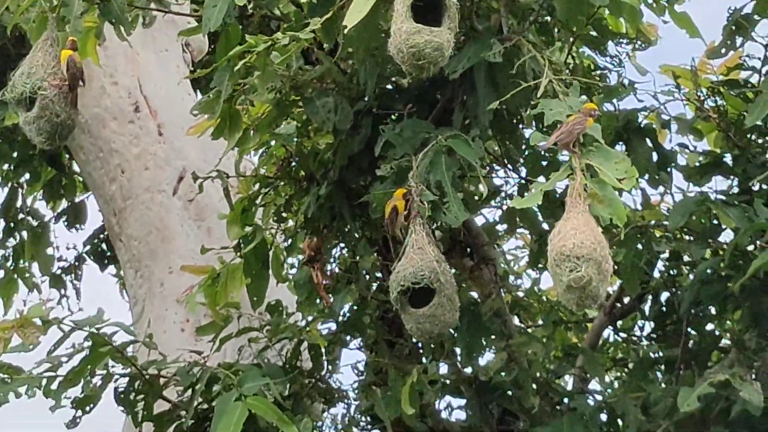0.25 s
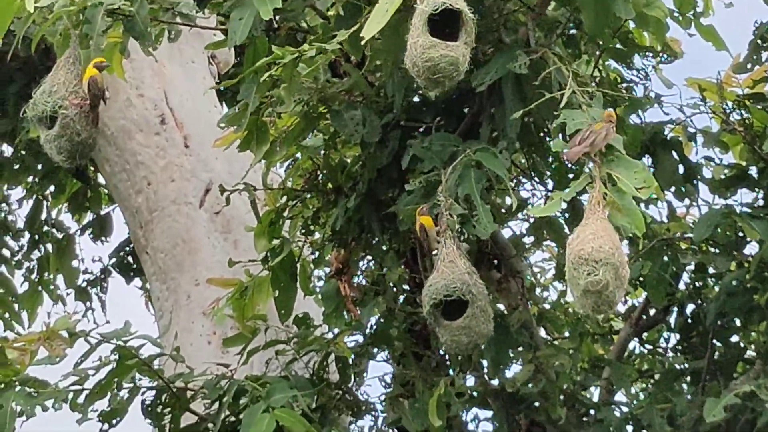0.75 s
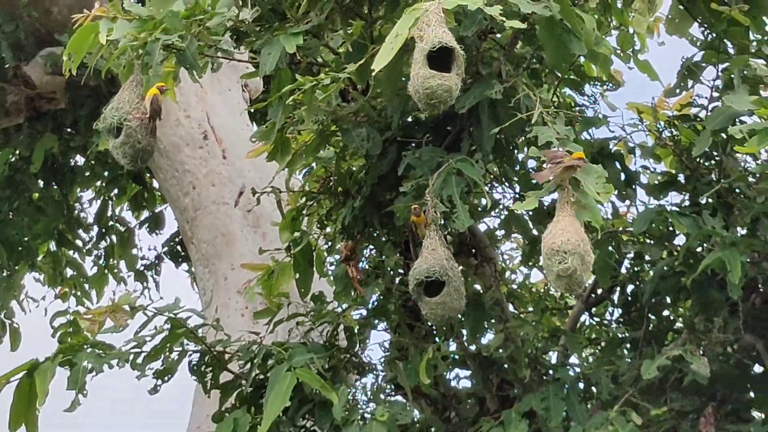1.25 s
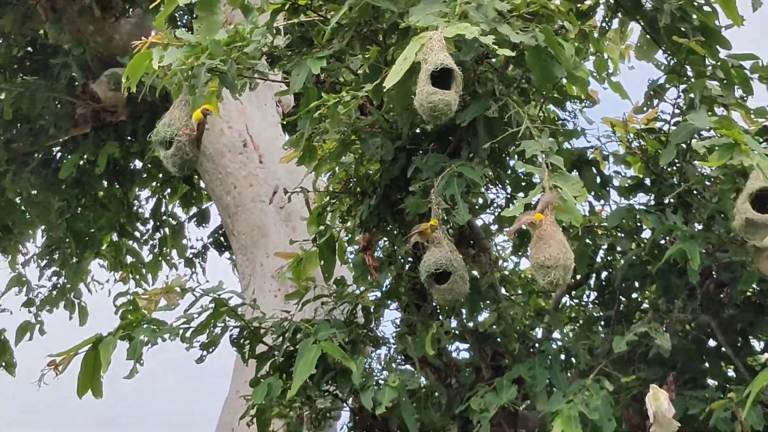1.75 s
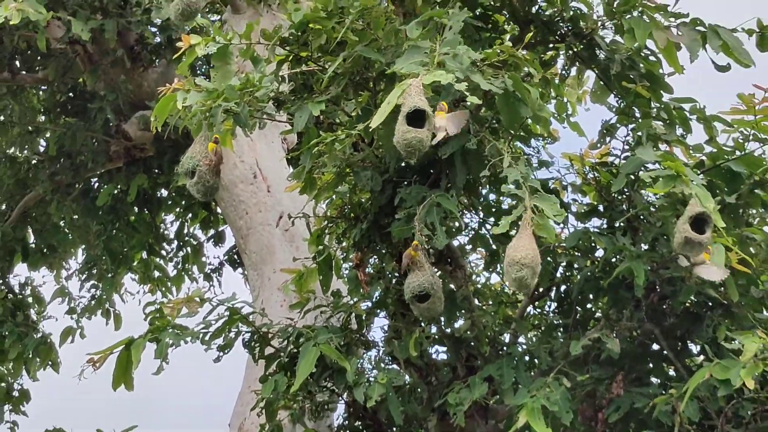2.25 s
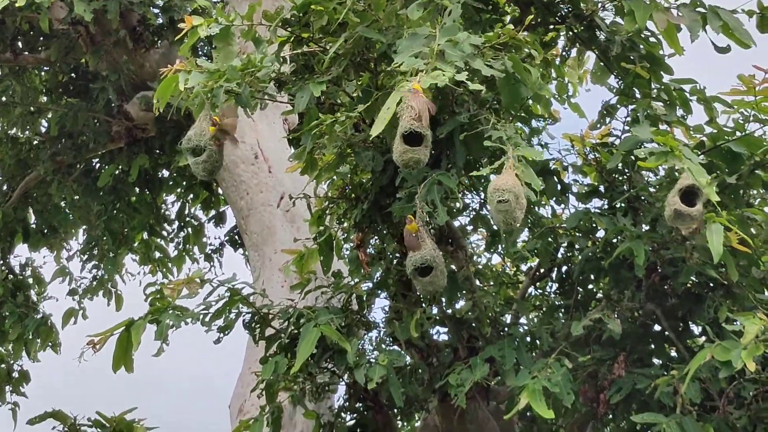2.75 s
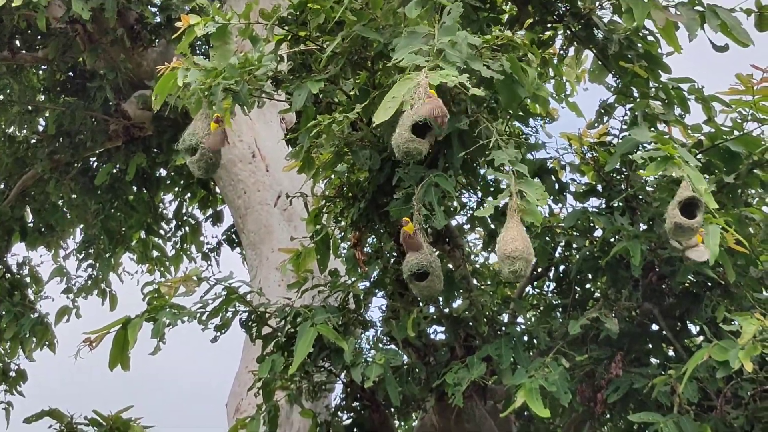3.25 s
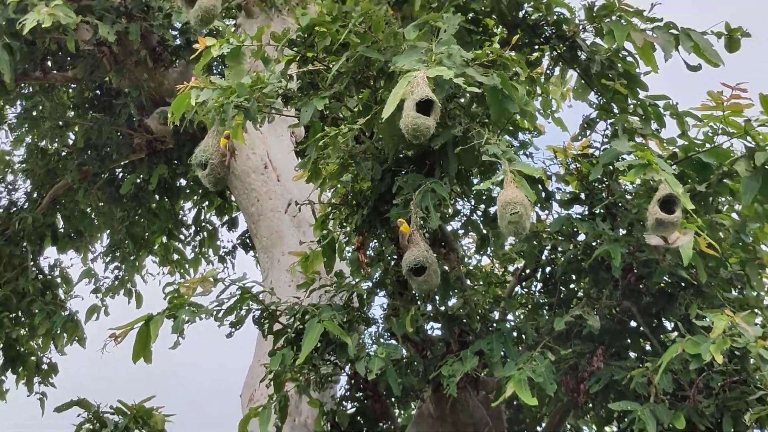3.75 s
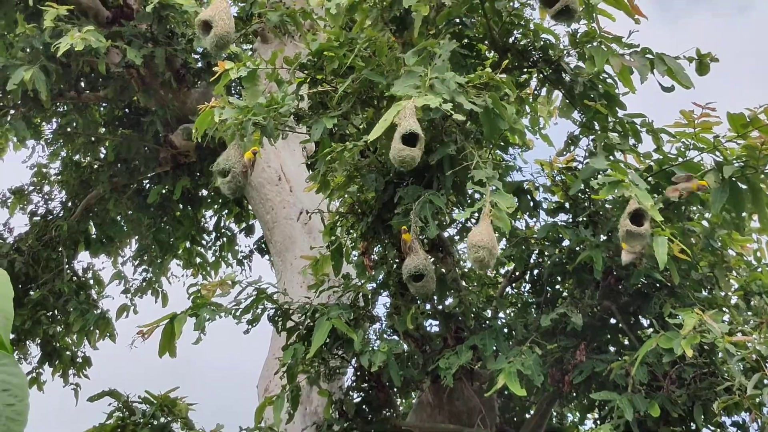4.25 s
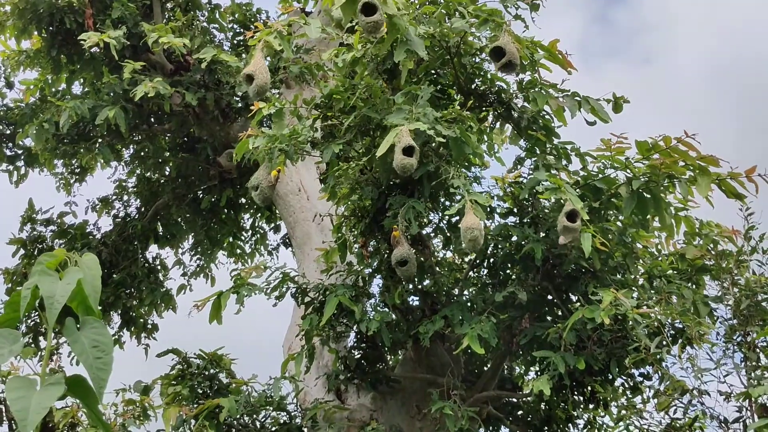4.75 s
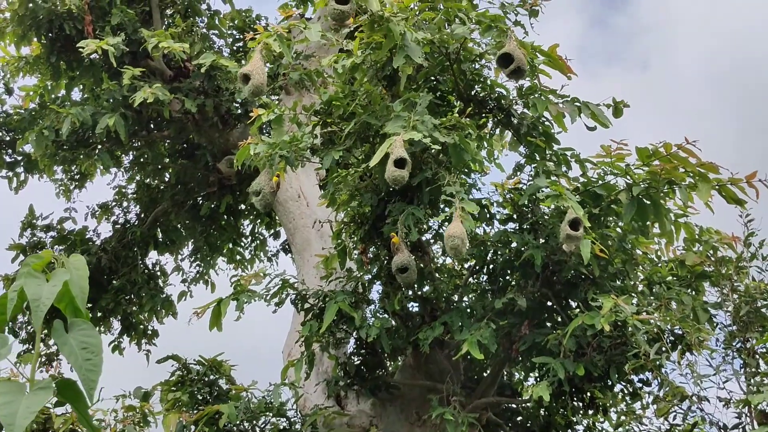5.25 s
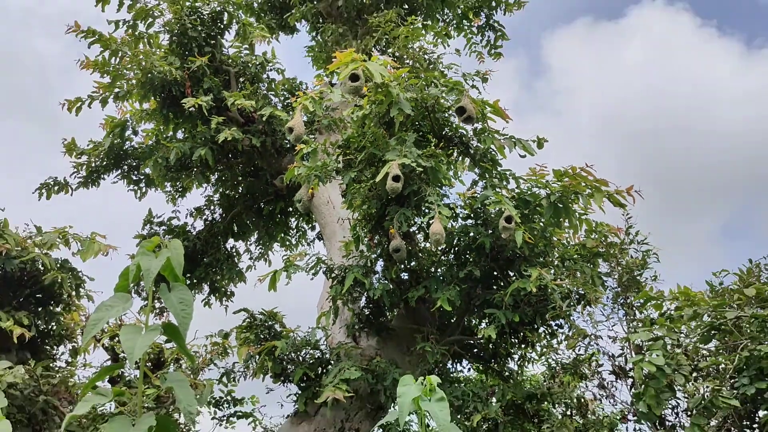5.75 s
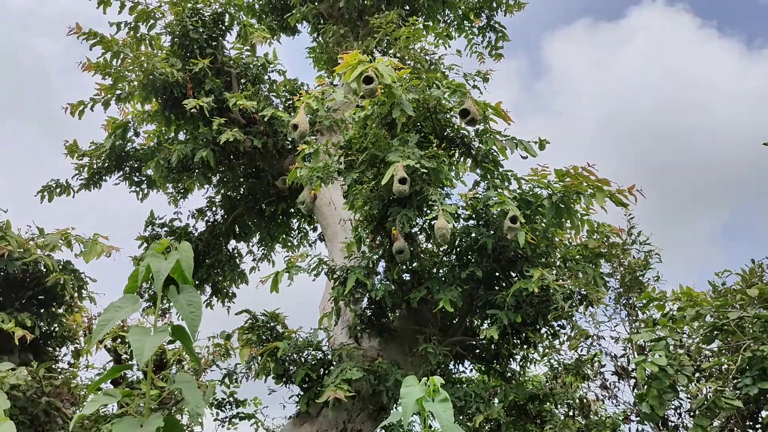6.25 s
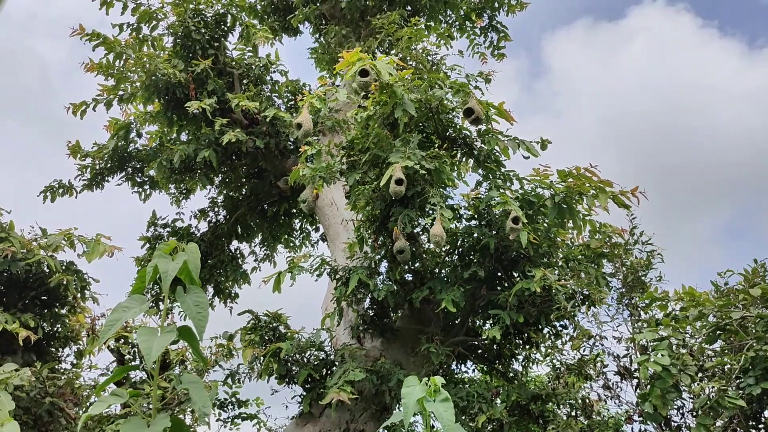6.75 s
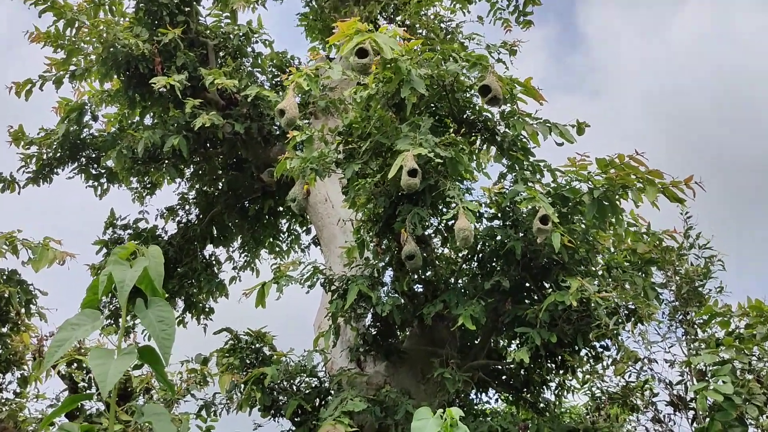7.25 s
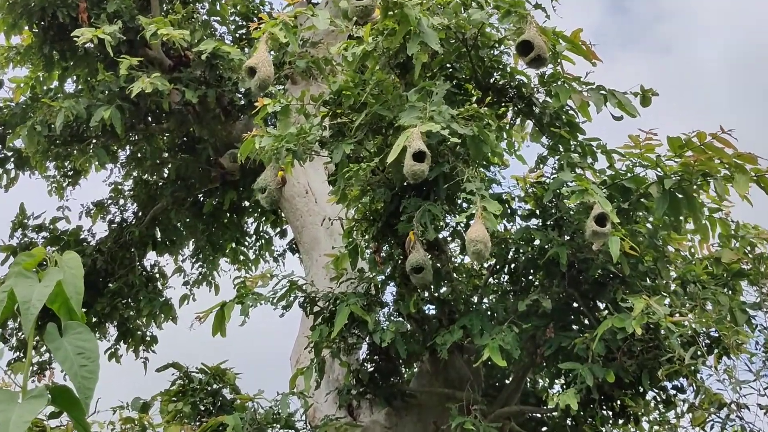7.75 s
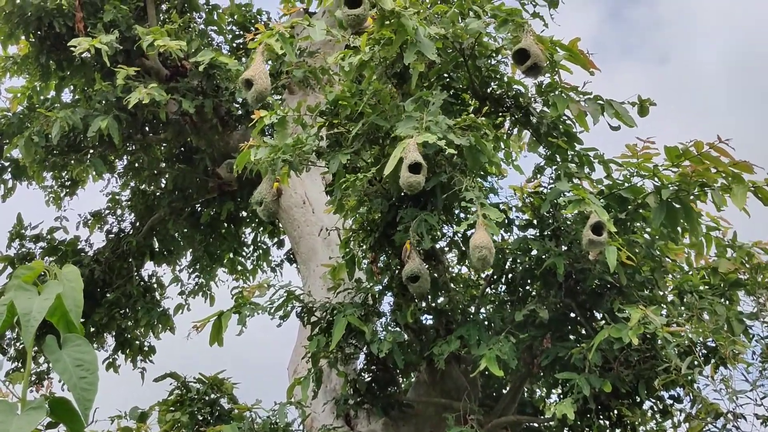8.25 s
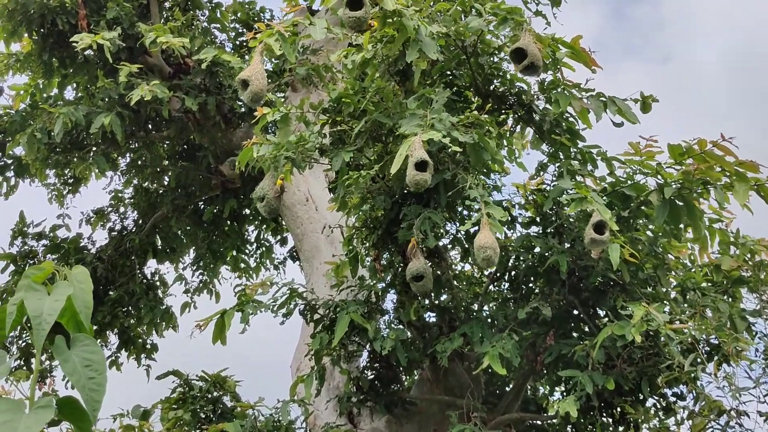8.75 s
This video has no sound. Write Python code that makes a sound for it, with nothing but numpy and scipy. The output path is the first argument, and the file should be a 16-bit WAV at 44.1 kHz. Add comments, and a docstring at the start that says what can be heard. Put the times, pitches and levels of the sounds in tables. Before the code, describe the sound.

Outdoor nesting birds: raspy high chirps repeat nearby, a busy chattering flurry swells early and thins out, nasal calls sounding behind.

```python
"""A leafy tree holding a colony of small weaver birds, heard from the ground through a small stereo microphone.
One near bird repeats a double chirp; others add falling slides, long dives, steep chucks, pips and scolds,
all sung as gliding raspy tones and scattered by leaves. A crowd of overlapping calls swells and ebbs behind.
A nasal harmonic caller and a soft whistler sound farther off, over a light breeze of filtered noise."""
import sys
import numpy as np
from scipy import signal
from scipy.fft import rfft, irfft
from scipy.io import wavfile
from scipy.ndimage import uniform_filter1d

SR = 44100
rng = np.random.default_rng(int(sys.argv[2]) if len(sys.argv) > 2 else 0)


def unload_wav(signal):
    """Save mono or channel-first audio to the path in sys.argv[1] as 16-bit WAV at rate SR, clipped to [-1, 1]."""
    wavfile.write(
        sys.argv[1],
        SR,
        np.round(np.clip(np.atleast_2d(signal).T, -1, 1) * 32767).astype(np.int16),
    )


def convert_level_to_amplitude(level_db):
    """Map a level in decibels to its linear amplitude factor."""
    exponent = np.asarray(level_db, float) / 20
    return 10 ** exponent


N = 397341

# call shapes, one list per stroke of the two-voiced throat: (time after onset [ms], pitch [Hz], level [dB])
SLIDE_STROKES = [
    [(-4, 7600, -30), (2, 7500, -6), (33, 6950, 2), (50, 6250, -2), (58, 5900, -25)],
    [(8, 6800, -30), (14, 6650, -6), (45, 6050, -2), (56, 5950, -12), (63, 5900, 3), (68, 5750, -8),
     (74, 5700, -30)],
    [(60, 5900, -30), (66, 5400, -10), (84, 4100, -19), (112, 3250, -26), (190, 2600, -36)],
    [(76, 7600, -30), (82, 7450, -5), (108, 6750, -5), (120, 6400, -30)],
    [(84, 6800, -30), (90, 6650, -7), (122, 6000, -8), (138, 5800, -30)],
    [(-6, 3450, -35), (2, 3350, -29), (45, 2950, -29), (60, 2800, -38)],
]
CHUCK_STROKES = [
    [(-3, 3800, -28), (0, 3550, 0), (7, 2650, -2), (15, 2200, -12), (32, 1750, -19), (46, 1350, -35)],
]
SECOND_STROKES = [
    [(-3, 5300, -35), (0, 6000, -3), (4, 6400, 0), (9, 6200, -1), (14, 6000, -10), (28, 6200, -32)],
    [(-2, 5200, -30), (1, 5700, -1), (8, 5700, -2), (12, 5200, -10), (18, 4400, -32)],
]  # second half of the double chirp


def rms_one(x):
    """Scale to unit rms."""
    return x / np.sqrt(np.mean(x ** 2) + 1e-20)


def band(x, low_hz, high_hz):
    """Band-pass."""
    return signal.sosfilt(signal.butter(2, [low_hz, high_hz], "band", fs=SR, output="sos"), x)


def coloured(x, spectrum):
    """Flatten the smoothed spectrum, then impose the table's; rms 1."""
    z, hz = rfft(x), np.linspace(1, SR / 2, N // 2 + 1)
    own = np.sqrt(uniform_filter1d(np.abs(z) ** 2, size=1500))
    table_hz, table_db = np.transpose(spectrum)
    want = convert_level_to_amplitude(np.interp(np.log(hz), np.log(table_hz), table_db))
    return rms_one(irfft(z * want / (own + 0.024 * own.mean()), N))


def bell(s, length_s):
    """Smooth rise and fall of height 1, down to 1/e at length_s from the centre."""
    return np.exp(-((np.arange(N) / SR - s) / length_s) ** 2)


def swells(rows, calm_db):
    """Gain of a steady calm with passing swells on top."""
    return convert_level_to_amplitude(calm_db) + sum(convert_level_to_amplitude(db) * bell(s, length_s) for s, length_s, db in rows)


def hush():
    """Level change [dB] of the colony's brief lulls, sample by sample."""
    # lulls: (centre [s], half-width to 1/e [s], depth [dB])
    lulls = [(0.317, 0.048, -25), (0.87, 0.02, -27), (1.206, 0.02, -23), (1.68, 0.039, -9.5),
             (2.092, 0.014, -8.5), (3.482, 0.045, -9), (4.526, 0.035, -17.5)]
    return sum(depth_db * bell(s, length_s) for s, length_s, depth_db in lulls)


def calls(shape, rows, octave_db, rasp, vary, third_db=-40, wobble=.008):
    """Sing the shape at every (time [s], level [dB], pitch factor): gliding sines, two overtones, fast rasp."""
    out = np.zeros(N + SR)
    flutter = rms_one(band(rng.standard_normal(N + SR), 240, 490))
    shake = 1 + wobble * rms_one(band(rng.standard_normal(N + SR), 70, 440))
    stretches = np.clip(1 + vary * rng.standard_normal(len(rows)), .6, 1.6)
    for (s, db, factor), stretch in zip(rows, stretches):
        for ms, hz, line_db in map(np.transpose, shape):
            start = max(round((s + ms[0] * stretch / 1000) * SR), 0)
            at = np.arange(start, round((s + ms[-1] * stretch / 1000) * SR))
            t_ms = (at / SR - s) * 1000 / stretch
            phase = 2 * np.pi * np.cumsum(factor * np.interp(t_ms, ms, hz) * shake[at]) / SR
            tone = np.sin(phase) + convert_level_to_amplitude(octave_db) * np.sin(2 * phase) + convert_level_to_amplitude(third_db) * np.sin(3 * phase)
            gain = convert_level_to_amplitude(db + np.interp(t_ms, ms, line_db)) * (1 + rasp * flutter[at])
            out[at] += gain * tone * signal.windows.tukey(len(at), .12)
    return out[:N]


def canopy(x, scatter_db, t60, direct_db, left_db):
    """Direct sound, later on the left, plus dense dying leaf scatter, separate per side, renewed by sway."""
    left_lag_samples, sway_s = 2, .2
    t, step = np.arange(SR // 3) / SR, round(sway_s * SR)
    padded = np.pad(x, (step, 2 * step))
    pieces = np.lib.stride_tricks.sliding_window_view(padded, 2 * step)[::step]
    pieces = pieces * signal.windows.hann(2 * step, sym=False)  # overlapping crossfades
    decay = convert_level_to_amplitude(-60 * t / t60) * (1 - np.exp(-t / 0.0071))
    tail = rng.standard_normal((2, len(pieces), len(t))) * decay
    tail = convert_level_to_amplitude(scatter_db) * tail / np.sqrt(np.sum(tail ** 2, axis=2, keepdims=True))
    tail[0, :, left_lag_samples] += convert_level_to_amplitude(direct_db)
    tail[1, :, 0] += convert_level_to_amplitude(direct_db)
    heard = signal.fftconvolve(pieces[None], tail, axes=2)
    out = np.zeros((2, N + 2 * SR))
    for k in range(len(pieces)):
        out[:, k * step:k * step + heard.shape[2]] += heard[:, k]
    return out[:, step:N + step] * convert_level_to_amplitude(np.array([[left_db / 2], [-left_db / 2]]))


def patchy(shared_db, x):
    """Third-octave bands above 1.2 kHz swell and fade together and each by itself."""
    out = signal.sosfilt(signal.butter(4, 1200, fs=SR, output="sos"), x)
    edges_hz = np.geomspace(1200, 9000, 10)
    for low_hz, high_hz in zip(edges_hz, edges_hz[1:]):
        own_db = 3 * rms_one(band(rng.standard_normal(N), 2, 9))
        out = out + convert_level_to_amplitude(shared_db + own_db - 2) * band(x, low_hz, high_hz)
    return out


def breeze():
    """Lumpy rumble, partly shared by both ports, a duller flutter above it, uneven hiss of air and far birds."""
    # gusts rumbling on the microphone ports: (centre [s], half-width to 1/e [s], level [dB])
    gusts = [(0.05, 0.49, -77.5), (1.63, 0.071, -66), (2.03, 0.19, -69), (3.46, 0.074, -72.5),
             (3.78, 0.19, -77.5), (4.4, 0.13, -80.5)]
    # dull flutters of leaves and wings: (centre [s], half-width to 1/e [s], level [dB])
    flutters = [(0.2, 0.29, -83.5), (2.5, 0.074, -82.5), (2.81, 0.078, -74.5), (3.15, 0.087, -83.5),
                (3.46, 0.018, -69.5), (3.92, 0.16, -82), (5.46, 0.11, -87), (7.96, 0.16, -85)]
    # relative hiss spectrum: (frequency [Hz], density [dB per Hz])
    air_spectrum = [(15, -54.5), (25, -27), (112, -16.5), (269, -47), (781, -45.5), (1020, -39),
                    (1300, -60), (1700, -38.5), (2010, -29.5), (2330, -29.5), (3340, -5), (6280, -11),
                    (7620, 7.5), (8200, -43.5), (10700, -73.5), (18000, -120)]
    air_db, hush_share = -49.5, 0.24  # the hiss sinks by this share of a lull's dB
    mid, side, leaf, hiss_left, hiss_right, lump = rng.standard_normal((6, N))
    lumps = convert_level_to_amplitude(0.46 * rms_one(band(lump, 5.2, 35)))
    pair = mid + 0.6 * side * np.array([[1], [-1]])
    rumble = swells(gusts, calm_db=-88.5) * lumps * rms_one(band(pair, 89, 163))

    dull = rms_one(band(band(leaf + 0.28 * pair, 150, 440), 230, 470))
    flutter = swells(flutters, calm_db=-102) * lumps * dull * convert_level_to_amplitude(np.array([[4], [-6]]))

    shared = 2.1 * band(mid, 21, 130)
    hiss = np.array([coloured(own + shared, air_spectrum) for own in (hiss_left, hiss_right)])
    drift_db = 4.6 * rms_one(band(lump, 1.67, 6.04))
    air = convert_level_to_amplitude(air_db + hush_share * hush()) * patchy(drift_db, hiss)
    return rumble + flutter + air


def nasal_caller():
    """Harmonic stack near 1 kHz: rises, droops and wavers; strong upper overtones come and go separately."""
    # calls: (time [s], length [s], pitch before bends [Hz], level [dB], overtone level before trims [dB])
    nasal_rows = [(0.087, 0.088, 1040, -79.5, 10), (0.391, 0.031, 1000, -72.5, -22),
                  (0.535, 0.067, 1035, -74.5, 7), (1.969, 0.14, 1178, -71.5, 0),
                  (2.33, 0.29, 1194, -71.5, 11), (2.89, 0.2, 1142, -73, -6), (3.244, 0.11, 1092, -70, 18),
                  (3.6, 0.13, 1097, -71.5, 7.5), (4.109, 0.26, 1204, -72, 1), (4.593, 0.18, 1054, -86, 17),
                  (4.956, 0.17, 1114, -78, 18), (5.316, 0.25, 1088, -75, 13.5),
                  (5.709, 0.24, 993, -75.5, 3.5), (6.103, 0.23, 1016, -73, 8), (6.598, 0.14, 1021, -72, 8),
                  (6.908, 0.2, 1005, -76, 9.5), (7.372, 0.18, 1034, -76, 8.5),
                  (7.708, 0.36, 1062, -84, 17.5), (8.305, 0.16, 1030, -73.5, 9.5),
                  (8.719, 0.21, 1018, -73.5, 11.5)]
    # trims of multiples 2 to 7: (level [dB])
    overtone_trims = [-15.5, -10.5, -1.5, 3, 5.5, -7.5]
    rest_hz, sag_per_s = 914, 1.7  # share of the distance to rest, per second of call
    out = np.zeros(N)
    waver = rms_one(band(rng.standard_normal(N), 14.0, 37))
    patches = [rms_one(band(n, 3, 14)) for n in rng.standard_normal((len(overtone_trims), N))]
    for s, length_s, first_hz, db, over_db in nasal_rows:
        sag_hz = (first_hz - rest_hz) * sag_per_s * length_s
        at = np.arange(round(s * SR), round((s + length_s) * SR))
        u = np.linspace(0, 1, len(at))
        hz = first_hz * (1 - 0.03 * (1 - u) ** 4.5) - sag_hz * u ** 2.6
        phase = 2 * np.pi * np.cumsum(hz * (1 + 0.016 * waver[at])) / SR
        over = 0
        for k, trim_db in enumerate(overtone_trims):
            gain = convert_level_to_amplitude(over_db - 2.0 + trim_db + 3 * patches[k][at])
            over = over + gain * np.sin((k + 2) * phase)
        swell = np.sin(np.pi * u) ** 0.13 * (1 + 0.5 * waver[at])
        out[at] += convert_level_to_amplitude(db) * swell * (np.sin(phase) * (0.4 + 0.78 * u) + over * (1 - 0.066 * u))
    return canopy(out, scatter_db=5, t60=0.13, direct_db=-2.0, left_db=-2.0)  # mostly scattered


def whistler():
    """Soft whistles that rise then fall, with more direct sound than scatter."""
    # stroke: (time after onset [ms], pitch [Hz], level [dB])
    whistle_strokes = [
        [(0, 1950, -30), (12, 2200, -6), (26, 2400, 3), (40, 2250, -6), (56, 2000, -22), (76, 1650, -30)],
    ]
    # calls: (time [s], level [dB], pitch factor [1])
    whistle_rows = [(6.084, -53.5, 1.001), (8.435, -62, .9)]
    sung = calls(whistle_strokes, whistle_rows, octave_db=-12.5, rasp=0.4, vary=0.018, wobble=.03)
    return canopy(sung, scatter_db=-4, t60=0.13, direct_db=1.5, left_db=-1.5)


def crowd(count):
    """Many birds overlap three calls in loose turn at random pitches; their sum follows the colony's swell."""
    # excitement of the colony as crowd level: (time [s], level [dB])
    excitement = [(0.0, -51), (0.12, -36.5), (0.24, -88), (0.5, -49.5), (1.08, -40), (1.43, -34),
                  (2.56, -31), (2.76, -29), (3.79, -30), (4.47, -37.5), (4.82, -37), (5.07, -49),
                  (5.13, -45), (5.8, -54.5), (6.1, -47), (7.0, -55.5), (7.68, -55), (7.9, -48), (8.05, -55),
                  (9.01, -50)]
    # relative crowd spectrum: (frequency [Hz], density [dB per Hz])
    crowd_spectrum = [(650, -70.5), (1100, -38), (1780, -41), (2170, -28), (2590, -28), (3090, -21),
                      (4120, 4.5), (4670, -5), (5120, -11), (6060, -10), (7350, -15.5), (7800, -3),
                      (8200, -58.5), (10700, -62.5), (18000, -120)]
    calm_db, low_trim_db, low_follow = -65, -0.5, 0.92  # low voices follow this share of the swell
    babble = 0
    for shape, octave_db in ((SECOND_STROKES, -6), (SLIDE_STROKES, -12), (CHUCK_STROKES, 8)):
        when, loud, pitch = rng.random((count, 3)).T
        times_s = (np.arange(count) + 2 * when) / count * N / SR
        rows = np.transpose([times_s, 10 * loud, .78 + .34 * pitch])
        sung = calls(shape, rows, octave_db=octave_db, rasp=0.5, vary=.25,
                     third_db=octave_db - 4.5, wobble=.02)
        babble = babble + canopy(sung, scatter_db=-2, t60=0.2, direct_db=-7, left_db=0)
    babble = np.array([coloured(ear, crowd_spectrum) for ear in babble])
    babble = babble * convert_level_to_amplitude(np.array([[1.7], [-1.7]]))
    level_db = np.interp(np.arange(N) / SR, *np.transpose(excitement))
    low_db = calm_db + low_trim_db + low_follow * (level_db - calm_db)
    hush_db = hush()
    out = 0
    for (low_hz, high_hz), db in (((4300, 8200), level_db), ((1000, 4300), low_db)):
        part = band(babble, low_hz, high_hz)
        power = uniform_filter1d(np.mean(part ** 2, axis=0), size=4000)  # evens out chance clumps and gaps
        out = out + convert_level_to_amplitude(db + hush_db) * part / np.sqrt(power + 0.15 * power.mean())
    return out


def scolds():
    """Raspy scolding notes, two falling lines with strong overtones."""
    # strokes: (time after onset [ms], pitch [Hz], level [dB])
    scold_strokes = [
        [(-2, 1430, -30), (3, 1400, -4), (22, 1300, -10), (41, 1150, -35)],
        [(-3, 2200, -28), (4, 2100, 1), (27, 2000, -7), (43, 1800, -33)],
    ]
    # calls: (time [s], level [dB], pitch factor [1])
    scold_rows = [(0.573, -65, 0.89), (0.67, -64, 0.81), (0.789, -61, 0.97), (0.8992, -60.5, 0.91),
                  (1.0021, -61, 0.97), (1.134, -59.5, 0.95), (1.225, -64, 0.91), (1.3448, -60, 0.94),
                  (1.476, -70, 0.76)]
    sung = calls(scold_strokes, scold_rows, octave_db=7.5, rasp=0.4, vary=0.11, third_db=-4.5)
    return canopy(sung, scatter_db=-4.5, t60=0.26, direct_db=-8.5, left_db=-1.0)


def chucks():
    """Steep falls whose overtones outweigh the fundamental."""
    # calls: (time [s], level [dB], pitch factor [1])
    chuck_rows = [(0.9043, -46.5, 1), (1.693, -40, 0.96), (1.8, -41, 0.94), (2.049, -53, 0.68),
                  (2.108, -41.5, 1), (2.168, -50, 0.69), (2.43, -57.5, 0.83), (3.5294, -40, 1.05),
                  (3.932, -48, 0.99), (4.089, -45, 0.98), (4.2422, -38.5, 1.0), (4.394, -40.5, 1.01),
                  (4.557, -40, .98), (4.6291, -51.5, 0.97), (4.915, -42, 1.1), (5.2804, -47.5, 0.92),
                  (5.4655, -54.5, 0.91), (6.052, -51.5, 0.92), (8.397, -53.5, 0.9)]
    sung = calls(CHUCK_STROKES, chuck_rows, octave_db=17, rasp=0.3, vary=.08, third_db=8, wobble=.018)
    return canopy(sung, scatter_db=-10, t60=0.2, direct_db=-11, left_db=3.5)


def pips():
    """Short, slightly falling near-sine notes, many in quick runs."""
    # stroke: (time after onset [ms], share of pitch [1], level [dB])
    pip_strokes = [
        [(-4, 1.05, -28), (4, 1.02, 0), (12, 1.0, -2), (22, 0.94, -10), (30, 0.9, -30)],
    ]
    # calls: (time [s], level [dB], pitch [Hz])
    pip_rows = [(1.6796, -45, 4240), (2.034, -36, 4240), (2.1173, -38, 4520), (2.2382, -30.5, 4610),
                (2.333, -27, 4420), (2.548, -33.5, 4500), (2.657, -27.5, 4640), (2.7555, -23, 4850),
                (2.857, -34, 4740), (3.1687, -46, 4720), (3.271, -23, 4970), (3.3626, -30.5, 4620),
                (3.5366, -29, 4650), (3.7643, -29.5, 4850), (3.9172, -23, 4930), (4.468, -35.5, 4410)]
    sung = calls(pip_strokes, pip_rows, octave_db=-40, rasp=0.48, vary=0.045)
    return canopy(sung, scatter_db=-9, t60=0.12, direct_db=-6, left_db=3.0)


def dives():
    """Long dives from a held note."""
    # stroke: (time after onset [ms], pitch [Hz], level [dB])
    dive_strokes = [
        [(-8, 5900, -25), (0, 5850, -7), (20, 5900, 0), (26, 5500, -5), (38, 4300, -11), (58, 3900, -13),
         (66, 4100, -28)],
    ]
    # calls: (time [s], level [dB], pitch factor [1])
    dive_rows = [(1.296, -31, .99), (1.484, -27, 1.03)]
    sung = calls(dive_strokes, dive_rows, octave_db=-39, rasp=0.22, vary=0.0066)
    return canopy(sung, scatter_db=-17, t60=0.12, direct_db=-3.5, left_db=6.0)


def slides():
    """Two-note falling slides, built of overlapping gliding strokes."""
    # calls: (time [s], level [dB])
    slide_rows = [(1.4717, -25.5), (1.862, -27), (2.2694, -28.5), (2.6764, -25), (2.7697, -32),
                  (3.065, -24.5), (3.2713, -35), (3.3572, -33), (3.7984, -30), (4.27, -27), (4.68, -30)]
    rows = [(s, db, 1) for s, db in slide_rows]
    sung = calls(SLIDE_STROKES, rows, octave_db=-20.5, rasp=0.6, vary=.05, wobble=.015)
    return canopy(sung, scatter_db=-6, t60=0.18, direct_db=-2, left_db=4.0)


def double_chirps():
    """One bird: a stroke that dives, then a second stroke at the same pitch factor."""
    # first strokes: (time after onset [ms], pitch [Hz], level [dB])
    chirp_strokes = [
        [(-4, 5700, -35), (0, 5900, 2), (4, 5950, 4), (8.5, 5800, 1), (11, 5100, -18), (15, 4400, -20),
         (21, 3700, -19), (28, 3350, -20), (33, 4300, -24), (36, 5700, -22)],
        [(-10, 5500, -40), (-7, 5800, -10), (-4, 6400, -4), (3, 7150, -9), (9, 7050, -12), (15, 6700, -35)],
    ]
    # calls: (time [s], level [dB], second stroke against the first [dB])
    chirp_rows = [(0.0611, -35.5, 7), (0.207, -30.5, 2.5), (0.4852, -32.5, 1), (0.7493, -35, -0.5),
                  (0.909, -39, 5.5), (1.0944, -37.5, 6.5), (1.232, -32, -4), (1.359, -36.5, 3),
                  (2.9201, -27.5, 0), (3.4173, -31, 5), (3.622, -27.5, 3.5), (4.01, -26.5, 0),
                  (5.2636, -38, 4.5), (5.655, -31, -3), (5.9579, -30.5, -4), (6.235, -30.5, -3),
                  (6.538, -30.5, -1), (6.7115, -29.5, -3.5), (6.8926, -29.5, -2), (7.0977, -30.5, 1.5),
                  (7.385, -31, 2), (7.6747, -31.5, 0), (7.9902, -31.5, 1), (8.2512, -30, 0),
                  (8.4636, -28.5, -4), (8.668, -29.5, -0.5), (8.8196, -28, -4), (9.0029, -37, -1)]
    second_after_s, pitch_spread = .0355, 0.0228
    s, db, second_db = np.transpose(chirp_rows)
    pitch = 1 + pitch_spread * rng.standard_normal(len(s))
    first_rows = np.transpose([s, db, pitch])
    second_rows = np.transpose([s + second_after_s, db + second_db, pitch])
    first = calls(chirp_strokes, first_rows, octave_db=8, rasp=0.4, vary=.05, wobble=.028)
    second = calls(SECOND_STROKES, second_rows, octave_db=-15.5, rasp=0.39, vary=0.1, wobble=0.018)
    return canopy(first + second, scatter_db=-6.5, t60=0.19, direct_db=-3, left_db=4.8)


def scene():
    """The tree from below."""
    far_birds = nasal_caller() + whistler()
    near_birds = scolds() + chucks() + pips() + dives() + slides() + double_chirps()
    return breeze() + far_birds + crowd(count=220) + near_birds


def top_cut(x):
    """Nothing passes above the cut-off."""
    return signal.sosfilt(signal.butter(12, 8630, fs=SR, output="sos"), x)


def record(dry):
    """Steep treble cut, 70 dB down from 8770 Hz up, then a faint electronic hiss."""
    cut = signal.sosfilt(signal.cheby2(12, 70, 8770, fs=SR, output="sos"), dry)
    hiss = convert_level_to_amplitude(-112) * rng.standard_normal(dry.shape)
    return top_cut(cut + hiss)


dry = scene()
out = record(dry)
unload_wav(out)
```